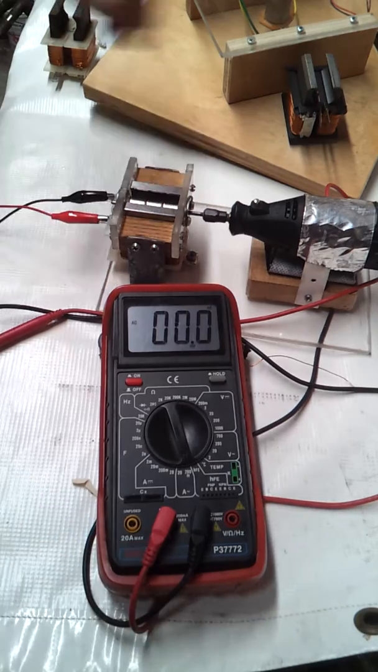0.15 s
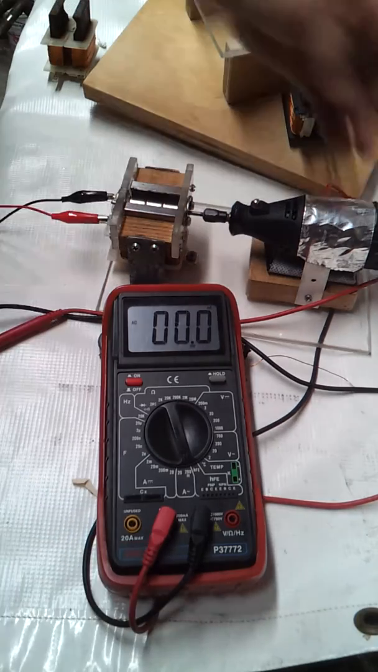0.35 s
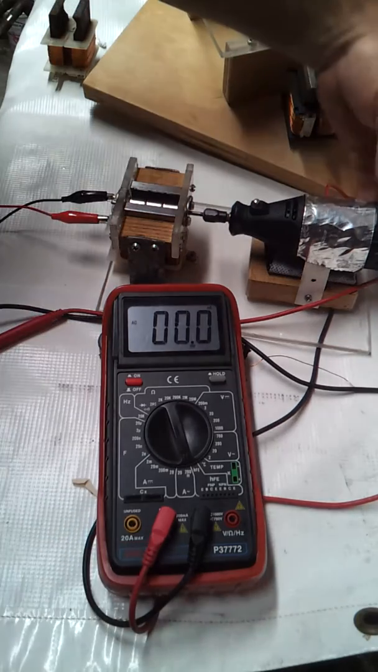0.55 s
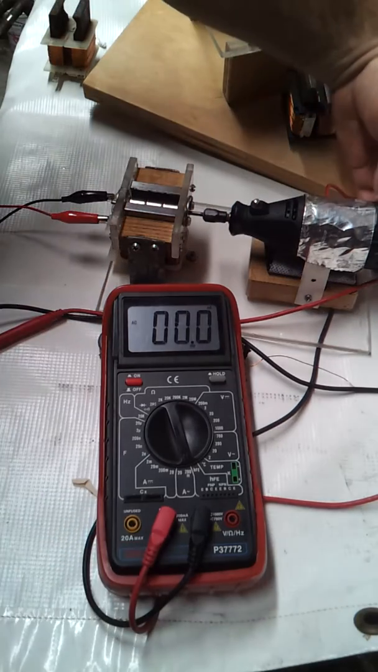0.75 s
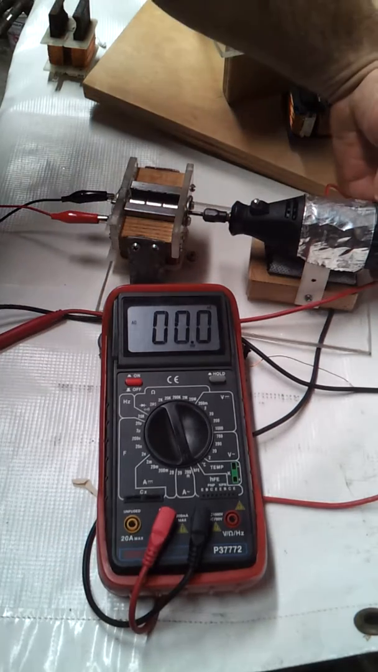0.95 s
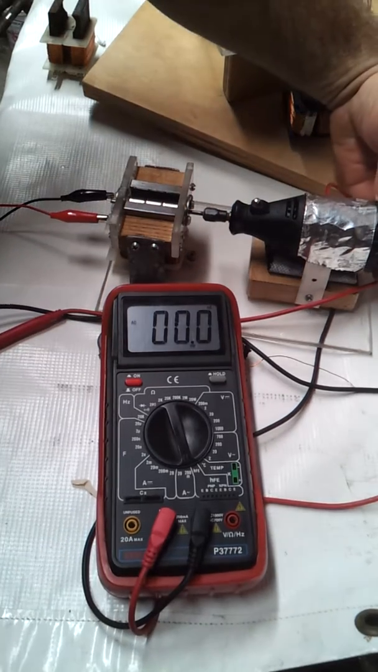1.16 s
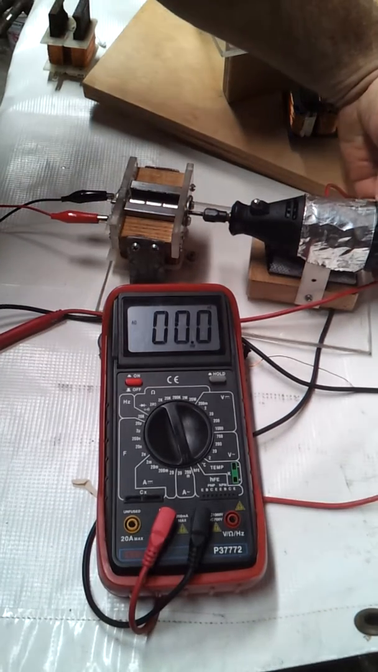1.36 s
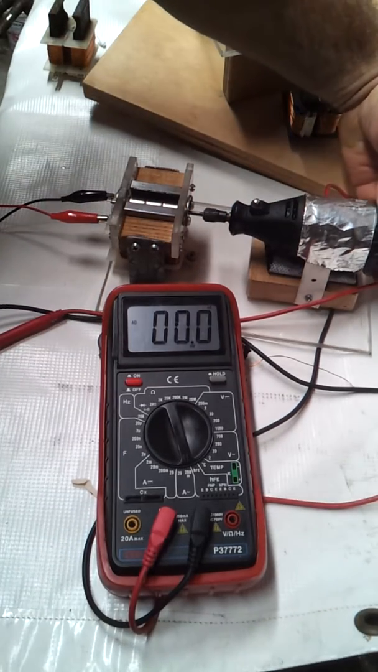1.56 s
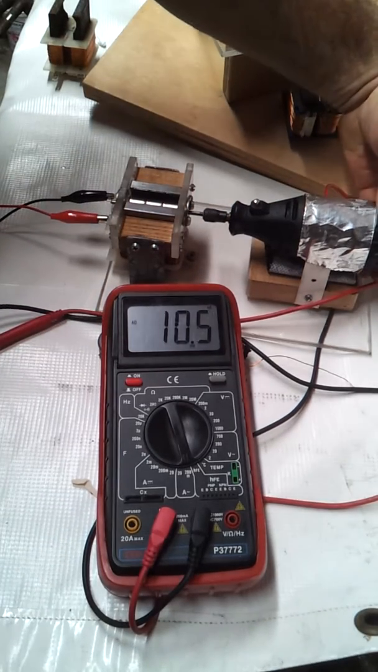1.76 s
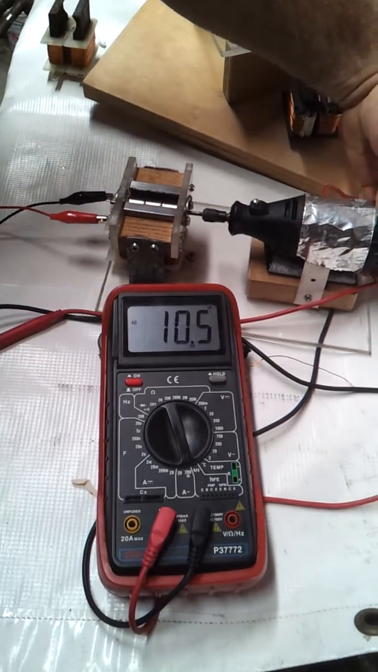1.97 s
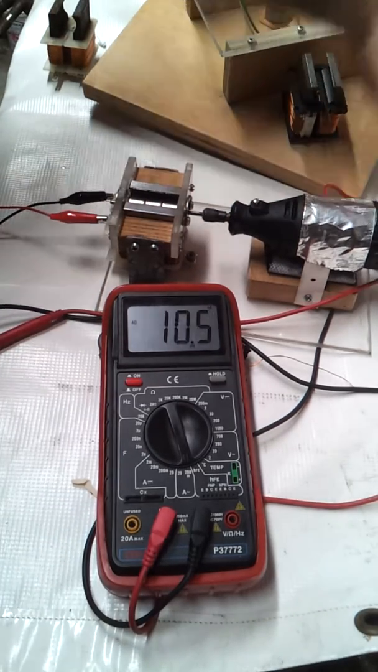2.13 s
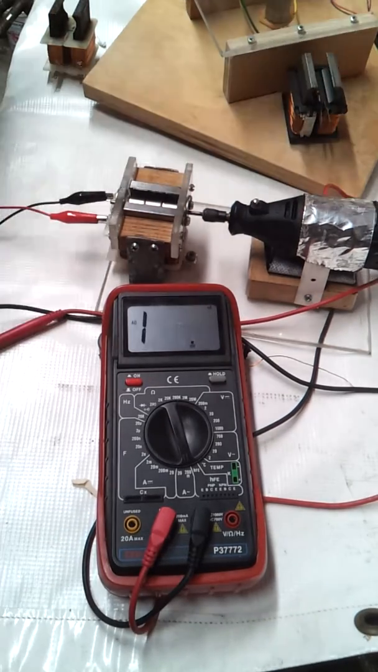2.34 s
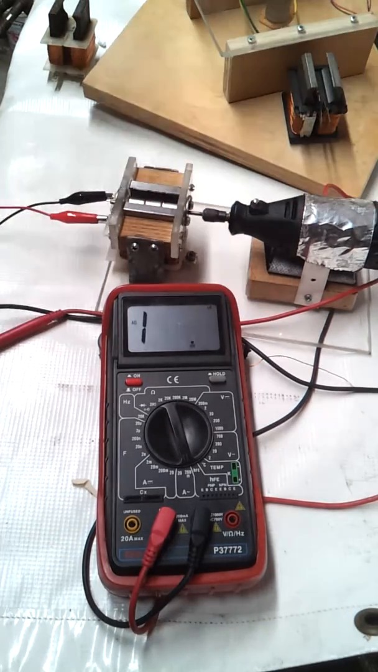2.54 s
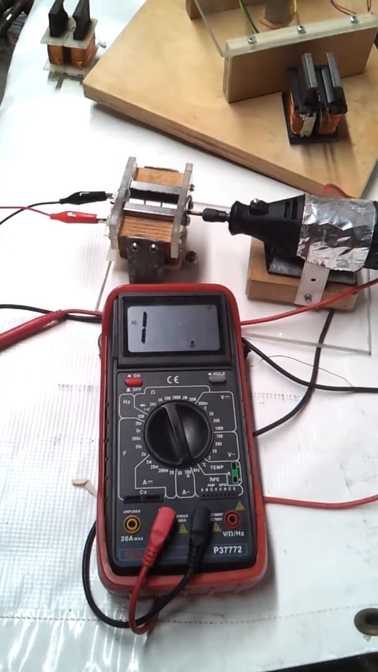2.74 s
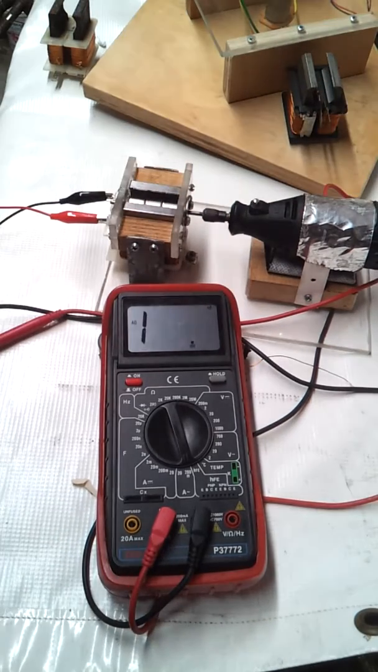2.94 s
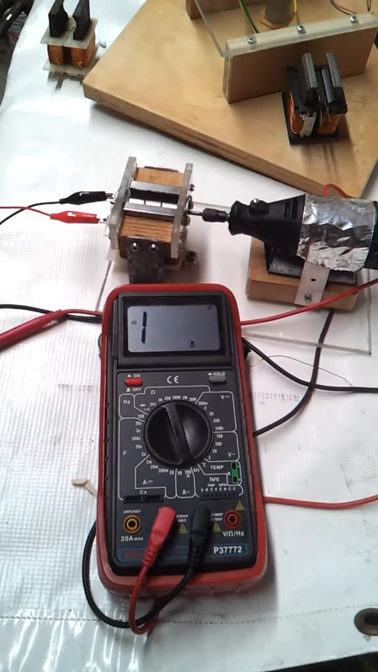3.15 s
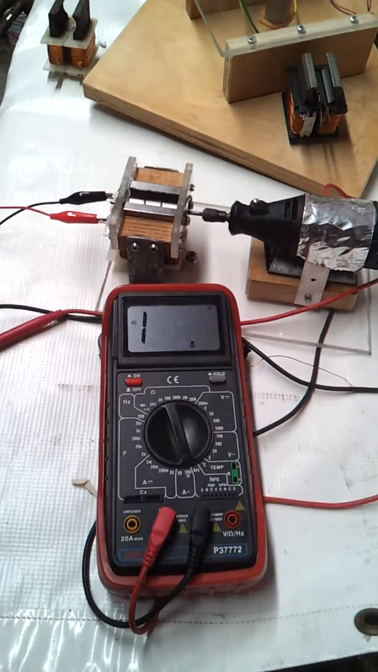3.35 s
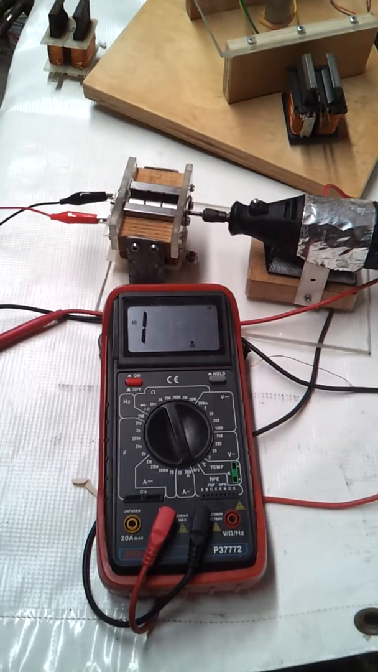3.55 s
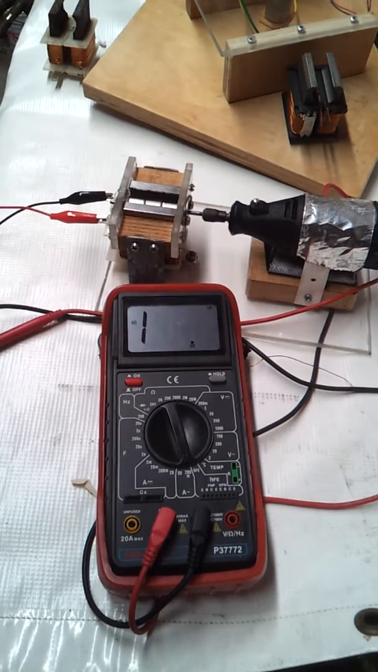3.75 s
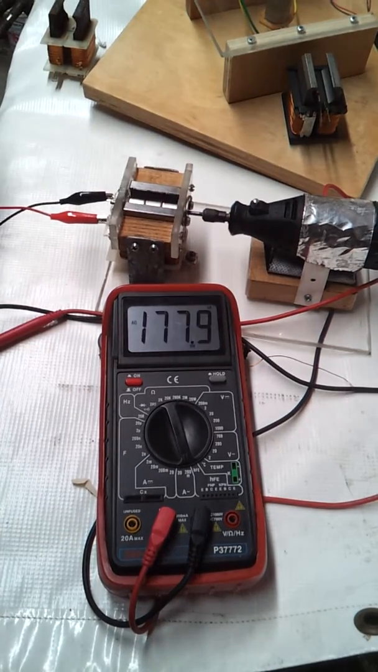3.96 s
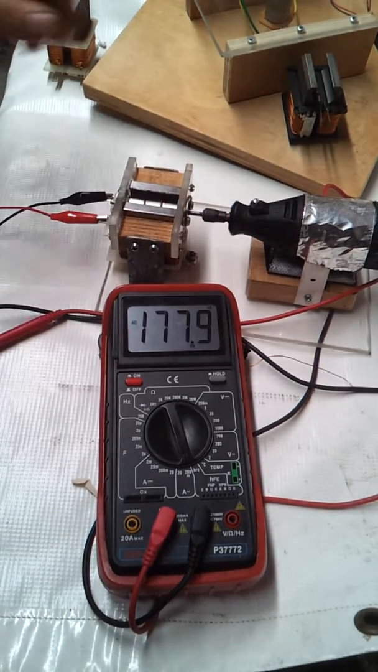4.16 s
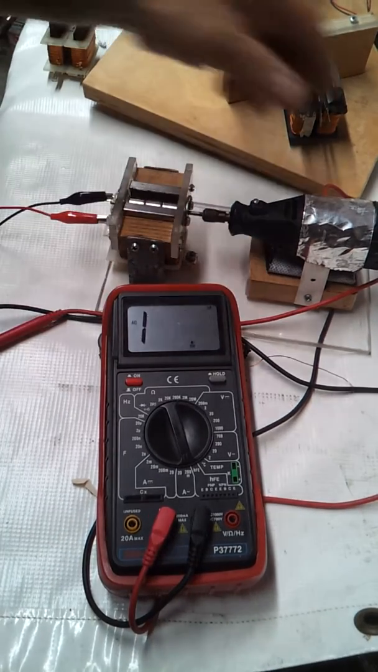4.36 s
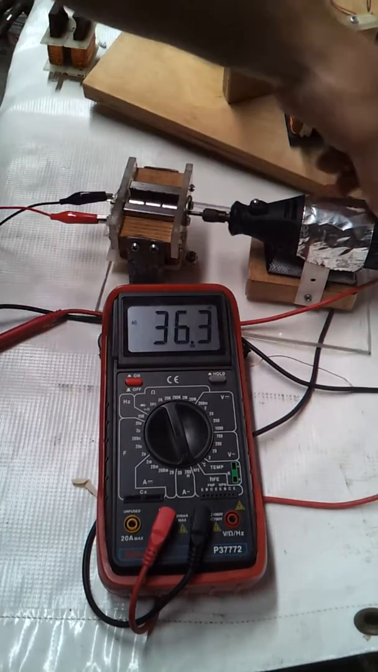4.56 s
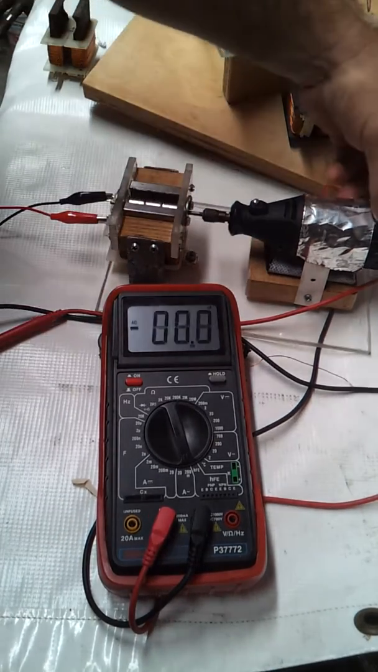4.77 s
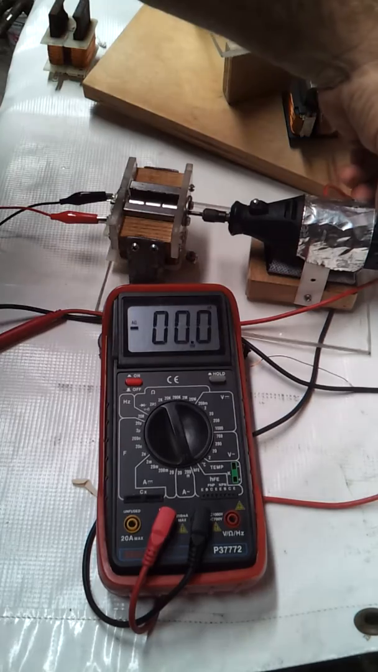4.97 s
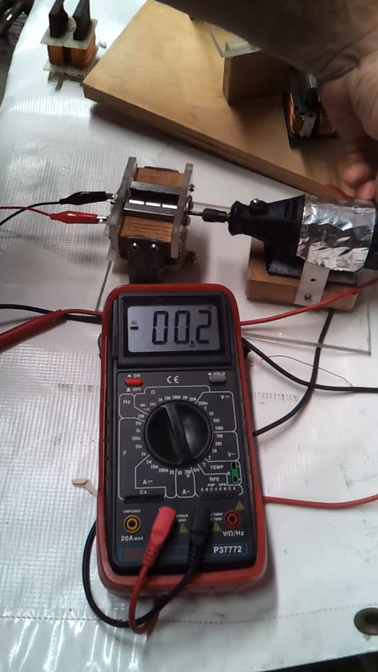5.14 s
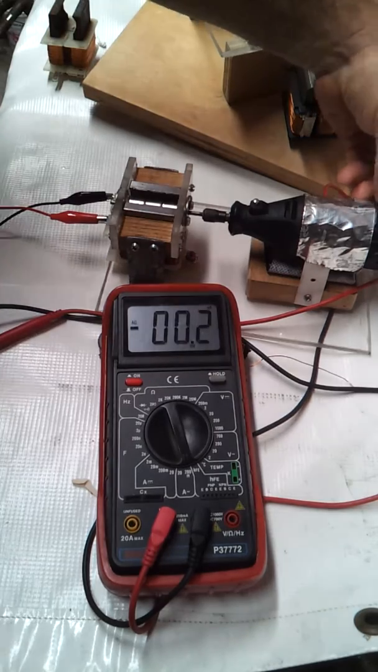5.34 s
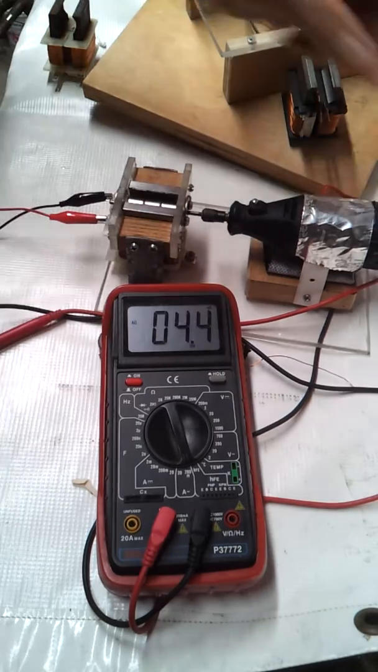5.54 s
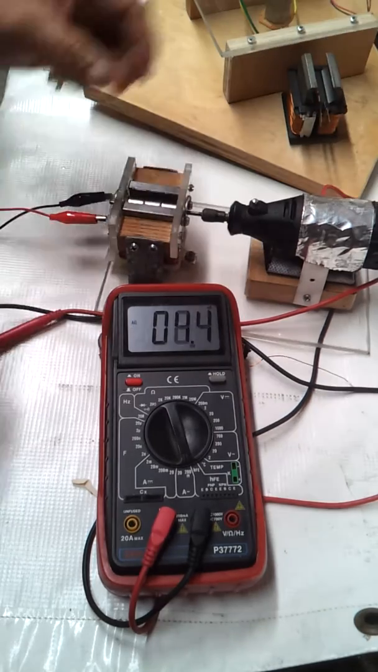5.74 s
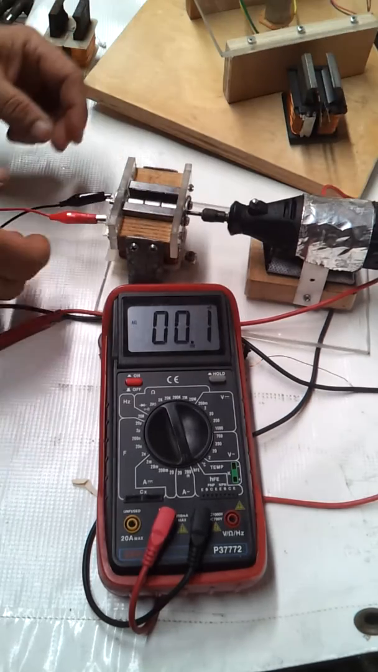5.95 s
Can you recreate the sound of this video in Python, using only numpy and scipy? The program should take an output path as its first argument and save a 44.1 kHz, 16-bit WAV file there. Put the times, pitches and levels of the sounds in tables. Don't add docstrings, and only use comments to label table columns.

```python
import sys
import numpy as np
from scipy import signal
from scipy.fft import rfft, irfft
from scipy.io import wavfile
from scipy.ndimage import uniform_filter1d

SR = 44100
rng = np.random.default_rng(int(sys.argv[2]) if len(sys.argv) > 2 else 0)


def digitize_waveform(pressure):
    field = np.atleast_2d(pressure).T
    bounded = np.clip(field, -1, 1)
    quanta = np.round(bounded * 32767).astype(np.int16)
    wavfile.write(sys.argv[1], SR, quanta)


def gain_from_db(level_db):
    decades = np.asarray(level_db, float) / 20
    return 10 ** decades


N = 264688
T = np.arange(N) / SR
HUM_HZ = 120.0
LAG_S = 15 / 44100

# pitch_hz, left_minus_right_db
LEFT = [(60, -10), (110, 16.5), (200, 3), (380, 6.5), (700, 8.5), (1290, 10), (2380, 1.5), (4400, -1.5),
        (8120, 6), (15000, 4)]
# pitch_hz, level_db (per Hz)
HISS = [(1000, 6), (1600, -7.5), (2400, 1.5), (3500, -4.5), (4500, -5.5), (6600, -3.5), (7600, -8.5),
        (9600, -17), (10800, -11.5), (12000, -21.5), (13800, -9.5), (15500, -35)]
# pitch_hz, level_db (per Hz)
RUMBLE = [(55, -19), (90, -2.5), (170, -7), (280, 0.5), (450, -5.5), (700, -0.5), (1100, -1), (1500, -18.5)]
# centre_s, depth_db, length_s
JOLTS = [
    (1.86, 2.5, .08),
    (3.2, 4, 0.21),
    (4.2, 4, 0.11),
    (5.3, 11, 0.046),
]


def curves(table):
    s, *columns = np.transpose(table)
    return [np.interp(T, s, c) for c in columns]


def shape(table, hz):
    f, v = np.transpose(table)
    return np.interp(np.log(hz), np.log(f), v)


def gate(t0, t1, fade):
    return np.clip((T - t0) / fade, 0, 1) * np.clip((t1 - T) / fade, 0, 1)


def walk(rate, slew=1):
    k = int(SR / rate)
    held = np.repeat(rng.standard_normal(N // k + 1), k)[:N]
    held = np.roll(held, rng.integers(k))
    return 1.204 * uniform_filter1d(held, max(int(k * slew), 1))


def patchy(rate, slew=1):
    return np.minimum(walk(rate, slew), 0.6)


def bells(rows, heights):
    return sum(h * np.exp(-((T - row[0]) / row[2]) ** 2) for row, h in zip(rows, heights))


def swells(rows):
    return bells(rows, [gain_from_db(db) for _, db, _ in rows])


def dips(rows):
    return -bells(rows, [depth for _, depth, _ in rows])


def tone(turns, hz, db, pan_db=None, lead=None):
    pan_db = shape(LEFT, hz) if pan_db is None else pan_db
    lead = -hz * LAG_S if lead is None else lead / (2 * np.pi)
    level = np.sqrt(2) * gain_from_db(db + np.array([pan_db, -pan_db]) / 2)
    cycles = np.array([turns + lead, turns]) + rng.random()
    return level * np.sin(2 * np.pi * cycles)


def noise(spectrum, flicker_db, rate, pan=1):
    # pitch_hz, share (0-1)
    common = [(60, 0), (500, 1), (1500, 0), (4000, 0.06), (9000, 0.13)]
    f = np.maximum(np.fft.rfftfreq(N, 1 / SR), 1)
    white = rfft(rng.standard_normal((3, N)))
    share = np.clip(shape(common, f), 0, 1)
    delay = np.array([np.exp(-2j * np.pi * f * LAG_S), 1 + 0 * f])
    pair = np.sqrt(share) * white[0] * delay + np.sqrt(1 - share) * white[1:]
    pair = pair * gain_from_db(shape(spectrum, f) + pan * np.outer([0.5, -0.5], shape(LEFT, f)))
    lowest, highest = spectrum[0][0], spectrum[-1][0]
    pair = pair * (f > lowest / 2) * np.minimum(1, (highest / f) ** 4) * np.minimum(1, (f / lowest) ** 4)
    out = 0
    for octave in np.arange(4.5, 14.5, 1 / 2):
        band = np.cos(np.pi / 2 * np.clip((np.log2(f) - octave) * 2, -1, 1)) ** 2
        out = out + gain_from_db(flicker_db * walk(rate)) * irfft(pair * band, N)
    return out / np.sqrt(np.mean(out.mean(axis=0) ** 2))


def resonate(x, hz, width):
    return signal.lfilter(*signal.iirpeak(hz, hz / width, SR), x)


def rings(x):
    # pitch_hz, width_hz, level_db
    housing = [(2320, 40, 9.5), (2710, 380, 5.5), (3385, 55, 13), (4270, 770, 3.5), (6180, 190, 6),
               (8300, 410, 8)]
    return sum(gain_from_db(db) * resonate(x, hz, width) for hz, width, db in housing)


def workshop_air():
    # pitch_hz, level_db (per Hz)
    room = [(20, 5), (50, -4), (95, 3), (122, 0), (160, -13), (250, -14), (500, -16), (1000, -18),
            (2000, -24), (4000, -28), (8000, -29), (14500, -31)]
    return gain_from_db(-47.3) * noise(room, 1.2, 6, pan=0.1)


def ticks():
    # start_s, peak_db, pitch_hz, thump_db, decay_s
    clicks = [
        (0.3072, -45, 10600, -46, 0.006),
        (0.9394, -46, 2310, -46, 0.006),
        (1.3972, -30, 5610, -23, 0.006),
        (1.4496, -33, 2360, -19, 0.006),
        (1.6242, -31, 6000, -28, 0.006),
        (5.9743, -41, 3330, -31, 0.006),
    ]
    out, t = np.zeros((2, N)), T[:int(0.12 * SR)]
    for s, db, hz, thump_db, decay in clicks:
        crack = rng.standard_normal((2, len(t))) * np.exp(-t / decay)
        edges_hz = [hz / 1.3, min(hz * 1.5, 13000)]
        crack = signal.sosfilt(signal.butter(1, edges_hz, "bandpass", fs=SR, output="sos"), crack)
        thump = np.sin(2 * np.pi * 75 * t) * np.exp(-t / 0.022)
        thump = thump + 1.06 * np.sin(2 * np.pi * 270 * t) * np.exp(-t / 0.028)
        tick = gain_from_db(db + 6.0) * crack + gain_from_db(thump_db) * thump * np.array([[1.4], [0.6]])
        i = int(s * SR)
        out[:, i:i + len(t)] += tick[:, :N - i]
    return out


def bench_bounce():
    # pitch_hz, level_db (per Hz)
    bounce = [(60, -20), (85, 18), (110, 5)]
    # centre_s, level_db, length_s
    kicks = [
        (1.77, -10.5, 0.041),
        (5.02, -22.5, 0.065),
        (5.23, -31.5, 0.028),
        (5.43, -21, .05),
        (5.61, -20, .04),
        (5.82, -19.5, .05),
    ]
    return swells(kicks) * noise(bounce, 0.51, 10)


def windings():
    # start_s, buzz_db, brush_db
    stall = [
        (1.39, -40, -48.5),
        (1.398, -38, -38),
        (1.426, -26, -61),
        (1.498, -24.5, -55),
        (1.59, -30.5, -55),
        (1.67, -20, -51.5),
        (1.738, -43, -51),
        (1.8, -20, -27),
    ]
    # multiple of hum, level_db
    buzz_partials = [(2, 0.5), (3, -13.5), (4, -22), (5, -22), (6, -43), (7, -36), (9, -24.5)]
    # centre_s, level_db, length_s
    strain = [
        (1.52, -26, 0.11),
        (1.77, -20.5, 0.1),
        (1.92, -22, 0.033),
        (2.3, -44, 0.16),
        (3.1, -34, 0.24),
        (3.65, -38.5, 0.34),
        (4.27, -27.5, 0.2),
        (4.65, -38, .1),
        (5.0, -35, .07),
    ]
    base_db, pan_db = -40, -1
    hum_db = 20 * np.log10(gain_from_db(base_db) + swells(strain))
    hum_pan_db = pan_db + 0.89 * (hum_db - base_db)
    hum = tone(HUM_HZ * T, HUM_HZ, hum_db + walk(12), hum_pan_db, -1.76)
    buzz_db, brush_db = curves(stall)
    buzz = 0
    for k, db in buzz_partials:
        buzz = buzz + tone(k * HUM_HZ * T, k * HUM_HZ + 0 * T, buzz_db + db + 3.5 * walk(24.64))
    hiss = noise(HISS, 5.7, 26.8)
    brush = gain_from_db(brush_db) * (1.9 * hiss + 3 * rings(hiss))
    brush = brush + gain_from_db(buzz_db - 14.5) * noise(RUMBLE, 1.3, 25.9)
    return gate(1.39, 5.06, 0.0083) * hum + gate(1.395, 1.76, 0.025) * (buzz + brush)


def speed():
    # start_s, shaft_hz
    dial = [(2.7, 410), (2.92, 406), (3.08, 397), (3.2, 401), (3.38, 404.5), (3.72, 388), (3.86, 385.7),
            (3.95, 391.8), (4.08, 387.2), (4.65, 379.6), (4.8, 382), (4.9, 379.8), (5.0, 338), (5.19, 257),
            (5.39, 182.1), (5.61, 108.7), (5.74, 80), (5.97, 38.23)]
    # short_hz (at break-free), time_constant_s
    lag = [(219, .31), (96, .07)]
    break_s, creep_hz, creep_hz_per_s = 1.7, 96, 900
    after = np.maximum(T - break_s, 0)
    hz = curves(dial)[0] - sum(short * np.exp(-after / tau) for short, tau in lag)
    creep = np.maximum(creep_hz + creep_hz_per_s * (T - break_s), 40)
    return np.where(T < break_s, creep, hz)


def rush_level(steady_hz):
    driven, coasting = 0.59, 1.9
    slope = coasting + (driven - coasting) * gate(1.686, 5.0, 0.056)
    return -27 + slope * 20 * np.log10(np.minimum(steady_hz / 370, 1)) + 0.83 * walk(10) + 4.5


def bearings(turns, steady_hz, slow, powered, hiss_db):
    rumble_db = -30.5 + 9 * gate(1.64, 2.03, 0.085) + 60 * np.log10(np.minimum(steady_hz / 85, 1))
    rumble_db = rumble_db - 7 * slow * (1 - 0.5 * powered) - 0.88 * dips(JOLTS[3:]) + 2.1 * walk(7)
    hiss = noise(HISS, 1.15, 14)
    dull = signal.lfilter(*signal.iirpeak(2600, 1.6, SR), hiss)
    dry_noise = 0.77 * hiss + dull + rings(hiss)
    rush = gain_from_db(hiss_db - 1.5) * ((1 - slow) * hiss + slow * dry_noise)
    pulse = (1 + 0.12 * np.cos(2 * np.pi * turns)) * (1 + 0.1 * powered * np.cos(2 * np.pi * HUM_HZ * T))
    return pulse * (rush + gain_from_db(rumble_db) * noise(RUMBLE, 2.1, 16))


def commutator_whine(turns, steady_hz, hz, slow, powered, hiss_db):
    # pitch_hz, level_db
    passed = [(1500, -80), (2800, -55), (4000, -36), (5200, -36), (6100, -44), (6400, -27), (6900, -35),
              (7250, -38.5)]
    lifts = [2.73, 3.29, 3.58, 3.755, 4.0, 4.51, 4.8, 5.025]
    bars = 18
    whine_db = shape(passed, bars * steady_hz) + dips([(s, 19, 0.024) for s in lifts])
    whine_db = whine_db - 60 * np.maximum(slow - 0.22, 0) * (1 - powered)
    whine_db = np.maximum(whine_db, hiss_db - 19 - 30 * slow) + 2 + patchy(30)
    double_db = hiss_db - 17 - 50 * slow - 12 * (hz > 394) + 2 * patchy(20)
    whine = tone(bars * turns, bars * hz, whine_db, lead=0.5)
    whine = whine + tone(2 * bars * turns, 2 * bars * hz, double_db)
    pairs = tone(bars / 2 * turns, bars / 2 * hz, -27 + 3 * patchy(25.04))
    return whine + gate(1.77, 2.25, 0.066) * pairs


def coupling_rattle(turns, steady_hz, hz, slow, powered, hiss_db):
    # pitch_hz, level_db
    body = [(100, 4), (280, 15), (400, 8), (800, 3), (1100, 0), (1550, -10), (1950, -9), (2400, -3),
            (3100, -8), (4000, -12), (4500, -9), (5600, -13), (6500, -17), (7600, -25), (14500, -36)]
    # centre_s, depth_db, length_s
    slips = [(1.78, 2, 0.036), (2.11, 9, 0.05), (2.35, 7, .12), (2.86, 7.5, 0.048), (3.436, 14, 0.029),
             (3.67, 6.5, 0.071), (3.99, 13, 0.062), (4.3, 6.5, .07), (4.94, 17, 0.063), (5.05, 6, .06),
             (5.25, 8.5, 0.077), (5.62, 7, 0.033)]
    # centre_s, level_db, length_s
    sixth = [(2.15, -25.5, 0.036), (2.28, -30, 0.044), (2.54, -35, 0.11), (3.08, -27.5, 0.12),
             (3.45, -36, 0.06), (3.57, -23, .04), (4.03, -24.5, 0.14), (4.54, -25, 0.11), (4.7, -27, .05),
             (4.85, -32, 0.075)]
    # centre_s, level_db, length_s
    seventh = [(1.91, -24, 0.053), (2.06, -24.5, .12), (2.817, -35, 0.055), (3.35, -35, 0.052),
               (3.568, -32, 0.026), (3.7, -35, 0.057), (4.085, -30, 0.025), (4.257, -26.5, 0.044),
               (4.545, -27.5, 0.041), (4.699, -26, 0.045), (4.86, -40, .05)]
    fade_db = 30 * np.log10(np.minimum(steady_hz / 75, 1))
    slip_db, jolt_db = dips(slips), dips(JOLTS)
    second_db = -19.5 - 7 * slow + slip_db - 0.63 * jolt_db + fade_db
    plate_db = 7 * np.exp(-((3 * steady_hz - 992) / 115) ** 2)
    third_db = -23.5 - 5 * slow - 7 * gate(5.34, 5.62, 0.04) + 0.28 * slip_db - 0.56 * jolt_db
    third_db = third_db - 3.5 + plate_db + 2.4 * walk(9) + fade_db
    resting = gain_from_db(-34 + hiss_db + 23)
    sixth_db = 20 * np.log10(resting + swells(sixth))
    seventh_db = 20 * np.log10(resting + swells(seventh))
    orders = 0
    for k, db in {2: second_db, 3: third_db, 6: sixth_db, 7: seventh_db}.items():
        orders = orders + tone(k * turns, k * hz, db + (1 + 6 * slow) * patchy(28))
    knock_db = 0.3 * (np.maximum(sixth_db, seventh_db) - hiss_db + 2)
    for k in [4, 5, *range(8, 36)]:
        state_db = 7 * patchy(14, 0.4) + knock_db - (1 + 0.6 * (10 < k < 15)) * jolt_db - 1 + 3 * (k == 5)
        slow_db = 8 * slow * patchy(28) - (4 - 2 * powered) * slow * max(k - 5, 0)
        db = hiss_db - 3 + shape(body, k * hz) + state_db + slow_db
        lead = rng.normal(0, 0.83) - 2 * np.pi * k * hz * LAG_S
        orders = orders + tone(k * turns, k * hz, db, lead=lead)
    return orders * (1 + 0.25 * powered * np.cos(2 * np.pi * HUM_HZ * T + 0.8))


def half_turn_knocks(turns, hz):
    # centre_s, level_db, length_s
    knocks = [
        (1.919, -23, 0.078),
        (2.656, -33, 0.064),
        (2.994, -35.5, 0.042),
        (3.553, -35.5, 0.051),
    ]
    return swells(knocks) * tone(turns / 2, hz / 2, 0)


def mains_beat(turns, hz):
    beat = tone(turns - HUM_HZ * T, hz, -30 + 3 * patchy(9), 17.5 + 4 * walk(3.94), 3.23)
    return gate(1.99, 5.03, 0.05) * beat


def shake(turns, hz, powered):
    # multiple of shaft, level_db (against unbalance)
    cogging = [(2, -10), (3, -12), (4, -15), (5, -19)]
    # pitch_hz, width_hz, left_gain, right_gain
    modes = [(76.2, 7, 0.16, -0.15), (89, 41, 0.23, 0.144), (114, 6.8, -0.55, 0.0028),
             (146, 16, 0.24, -0.52), (180.3, 51, 1.46, 0.45), (226, 140, -2.03, -1.3),
             (234.5, 7.2, -1.5, -0.73), (235.1, 68.5, 2.5, 1.21), (269.5, 19, -1.43, 0.38),
             (288.4, 32, -1.56, 0.14), (332.8, 35, 2.5, 0.2), (340.4, 14.0, -2.5, 0.14)]
    # start_s, left_db, right_db
    seat = [(2.06, 3.5, -12), (2.18, -7, -12), (2.32, -26, -18.5), (2.43, -18.5, -14.5), (2.77, -28, -27.5),
            (3.14, -15, -20), (3.57, -17, -14), (3.84, -23.5, -17), (4.13, -13, -18), (4.6, -29, -12),
            (4.82, -26, -15.5), (5.0, -12, -18)]
    # pitch_hz, left_lead (radians)
    turn_lead = [(60, .5), (230, 2), (300, 0), (345, -1.2), (372, -2.6), (384, -6), (410, -6)]
    crawl = np.clip(1 - hz / 200, 0, 1) ** 0.5 * np.clip(hz / 68, 0, 1) ** 4
    tugs = sum(gain_from_db(db + 2.9 * walk(24)) * np.sin(2 * np.pi * k * turns) for k, db in cogging)
    force = np.sin(2 * np.pi * turns) + crawl * tugs
    force = force * gate(1.66, 6.1, 0.05) * gain_from_db(1 + 5 * crawl * patchy(22))
    sweep = sum(np.outer([left, right], resonate(force, f, width)) for f, width, left, right in modes)
    driven = gain_from_db(np.outer([3, 4], powered))
    left_db, right_db = curves(seat)
    steady = tone(turns, hz, (left_db + right_db) / 2, left_db - right_db, shape(turn_lead, hz))
    hold = gate(2.03, 5.04, 0.034)
    return (1 - hold) * driven * sweep + hold * steady


def rotor():
    steady_hz = speed()
    powered = gate(1.39, 5.03, 0.021)
    slow = np.clip(1 - steady_hz / 375, 0, 1)
    hiss_db = rush_level(steady_hz)
    hz = steady_hz * (1 + 0.0011 * walk(40) + 0.0327 * slow * walk(60))
    smooth_turns, turns = np.cumsum(steady_hz) / SR, np.cumsum(hz) / SR
    out = bearings(turns, steady_hz, slow, powered, hiss_db)
    out = out + commutator_whine(turns, steady_hz, hz, slow, powered, hiss_db)
    out = out + coupling_rattle(turns, steady_hz, hz, slow, powered, hiss_db)
    out = out + half_turn_knocks(turns, hz) + mains_beat(turns, hz)
    out = out + shake(smooth_turns + 0.14 * (turns - smooth_turns), hz, powered)
    return gate(1.64, 6.1, 0.027) * out


def scene():
    return workshop_air() + ticks() + bench_bounce() + windings() + rotor()


def band_limit(x):
    return signal.sosfilt(signal.butter(12, 15690, fs=SR, output="sos"), x)


def record(dry):
    low_pass = signal.ellip(10, 0.3, 60, 14520, fs=SR, output="sos")
    cut = signal.sosfilt(low_pass, np.clip(dry, -1, 1))
    return band_limit(np.clip(cut, -1, 1))


dry = scene()
out = record(dry)
digitize_waveform(out)
```